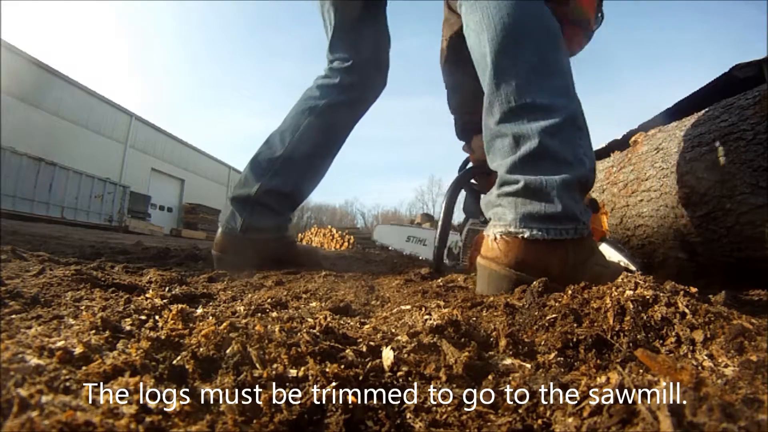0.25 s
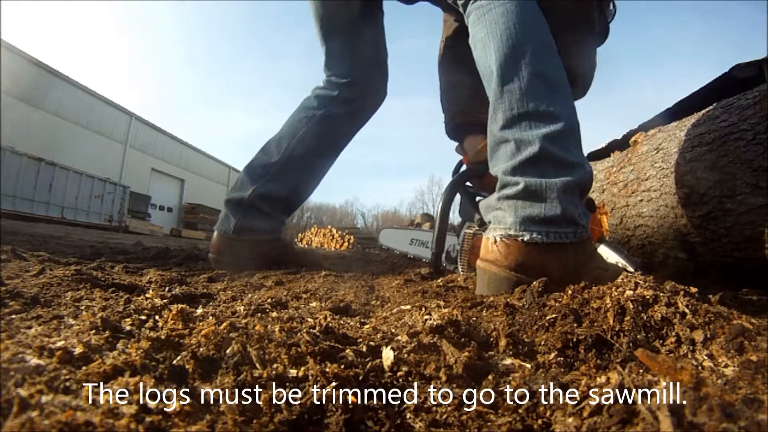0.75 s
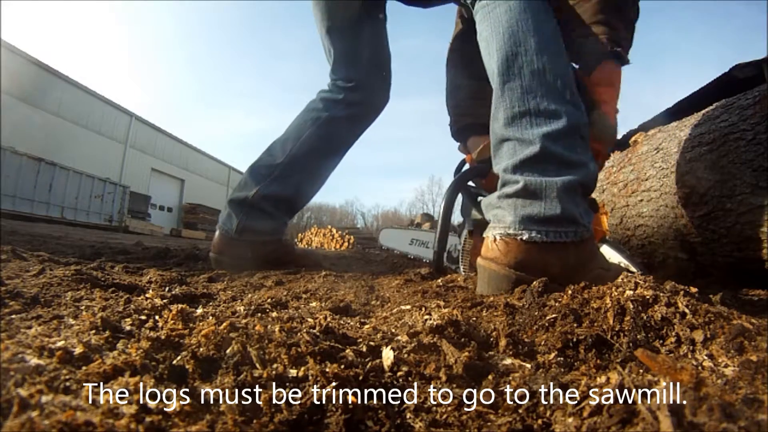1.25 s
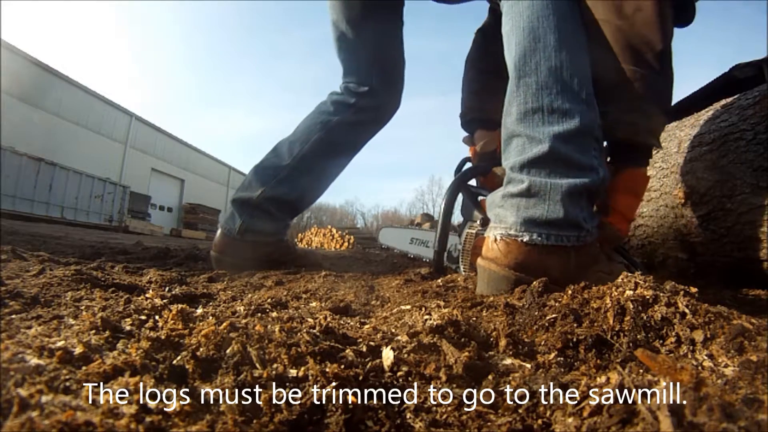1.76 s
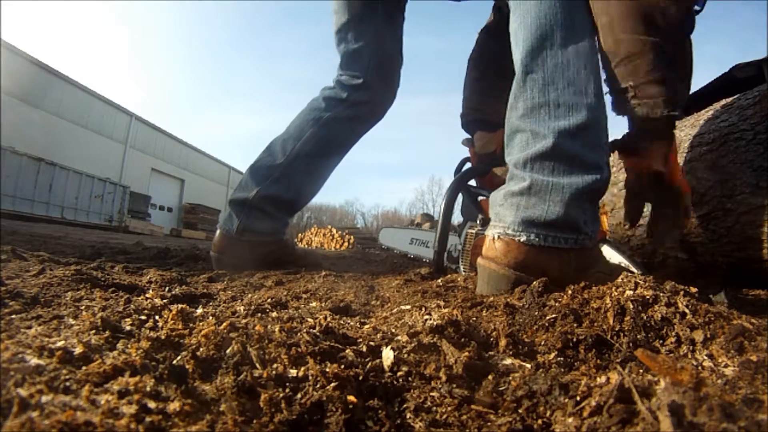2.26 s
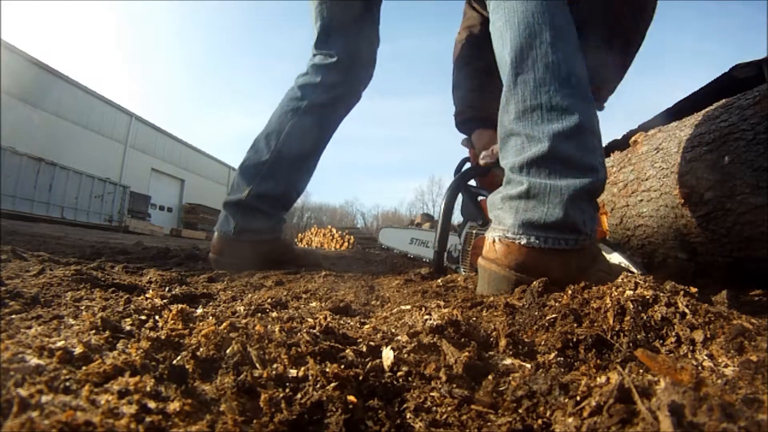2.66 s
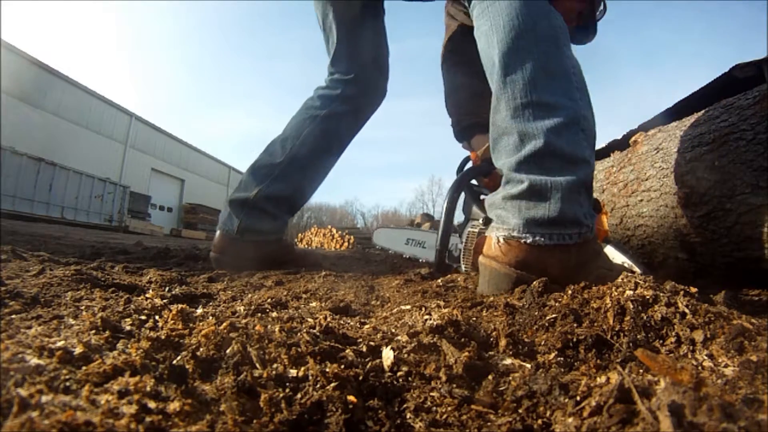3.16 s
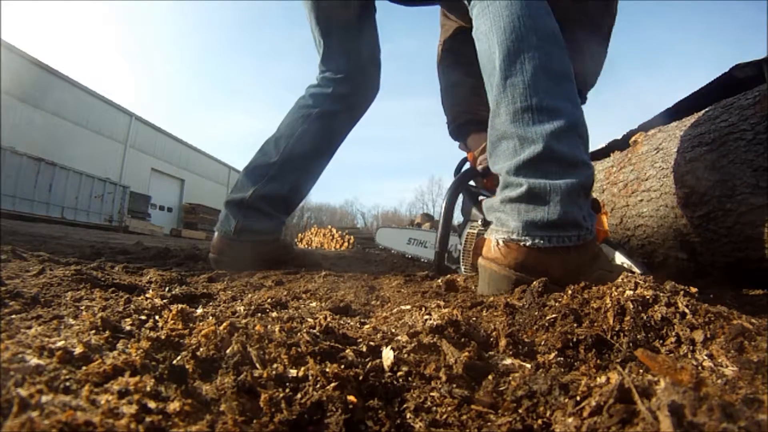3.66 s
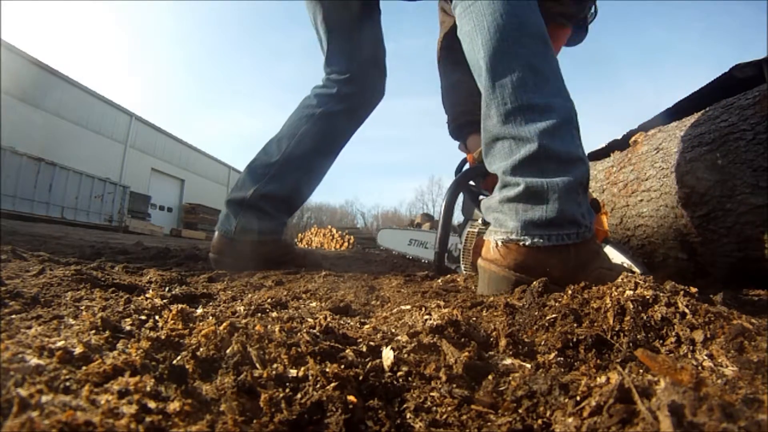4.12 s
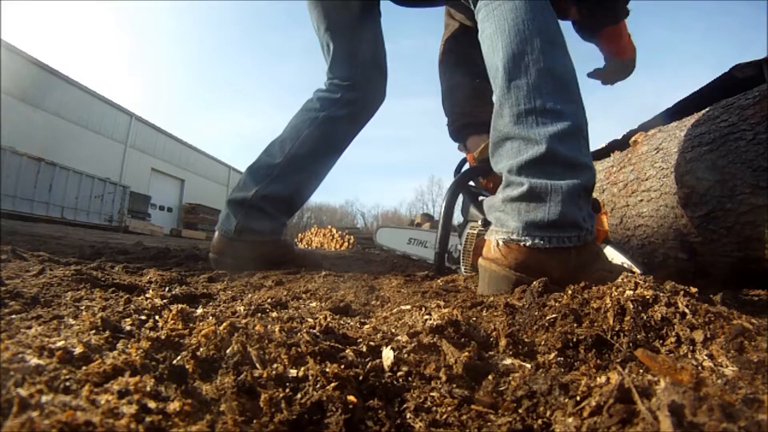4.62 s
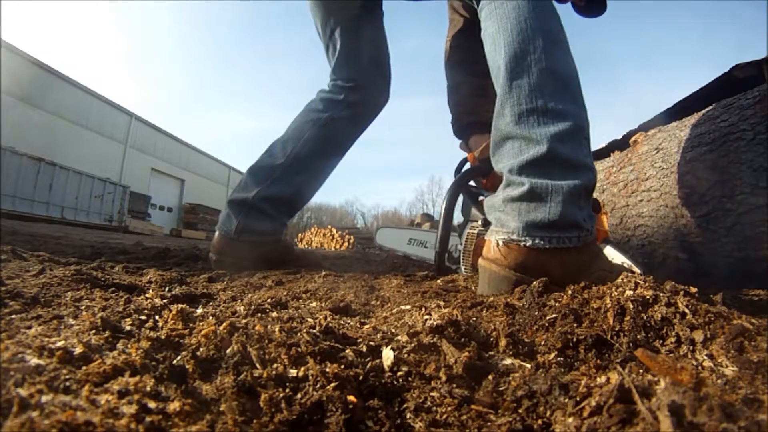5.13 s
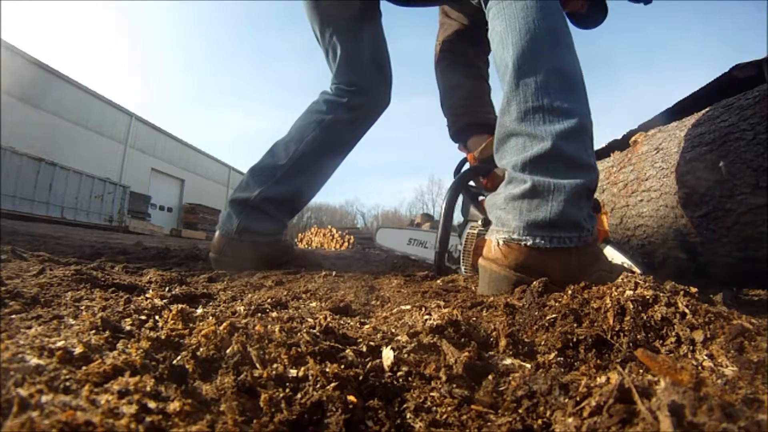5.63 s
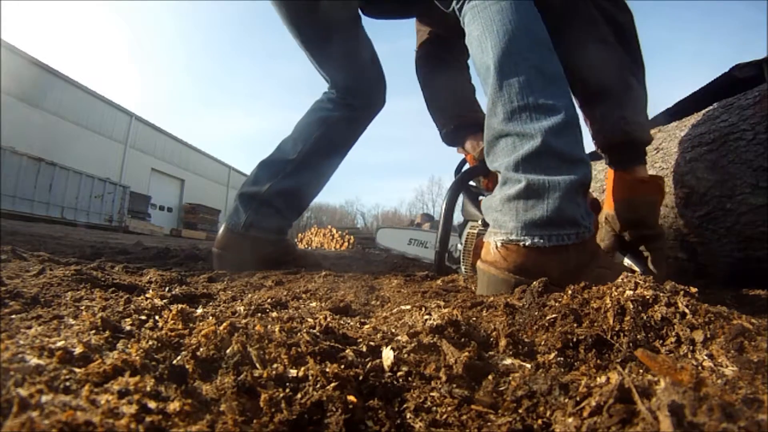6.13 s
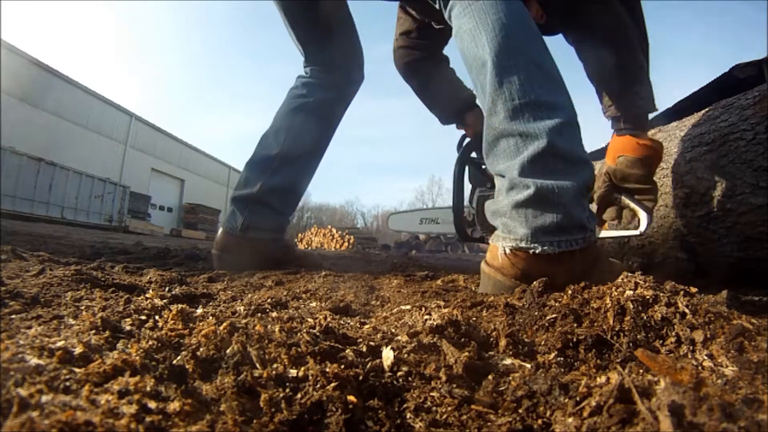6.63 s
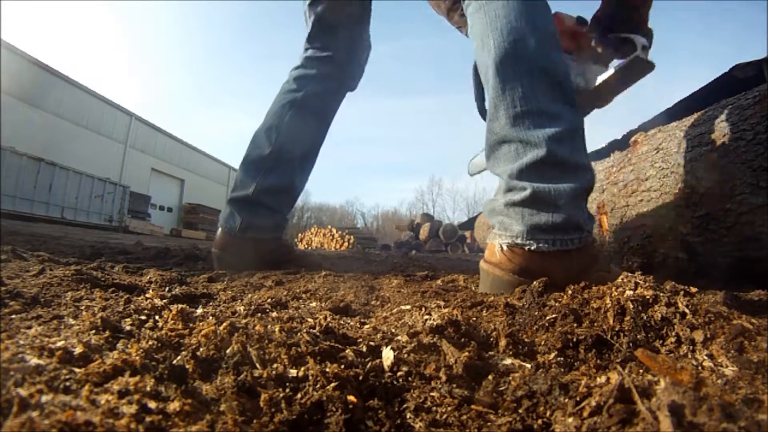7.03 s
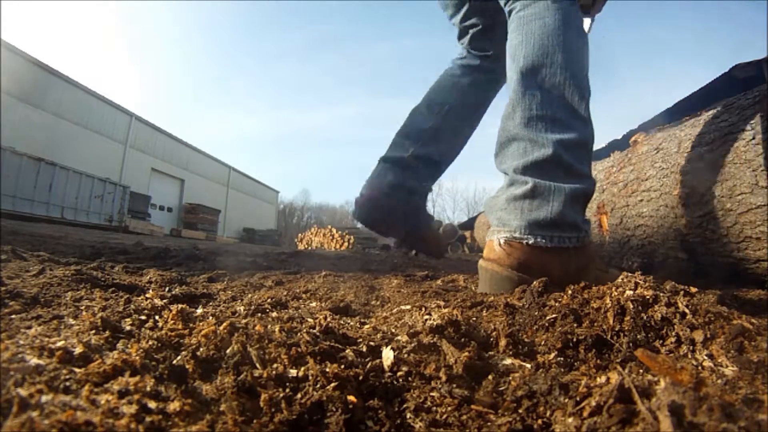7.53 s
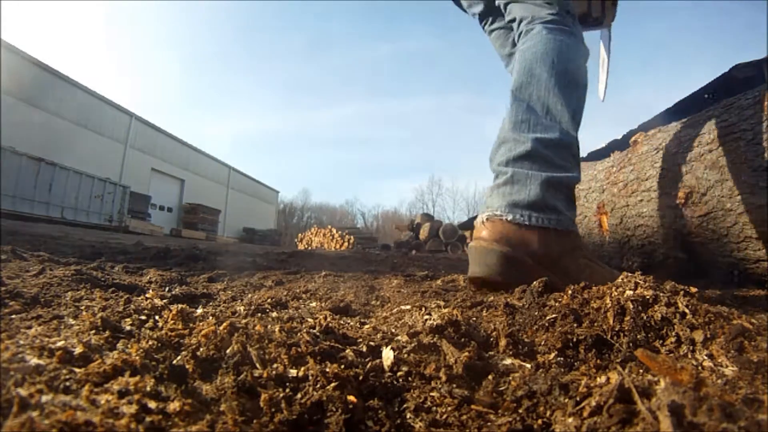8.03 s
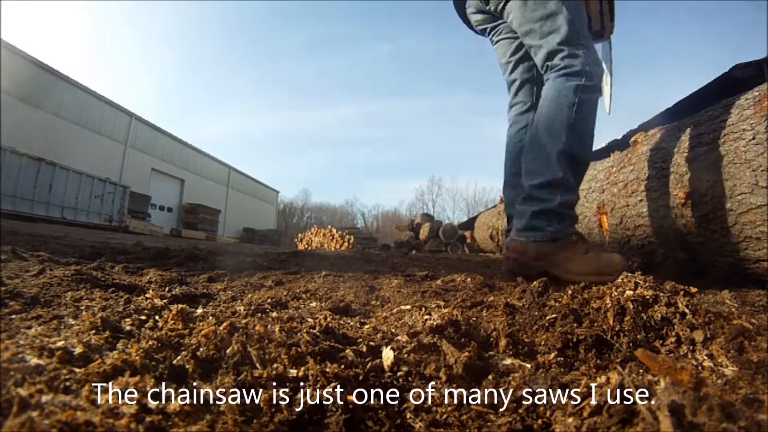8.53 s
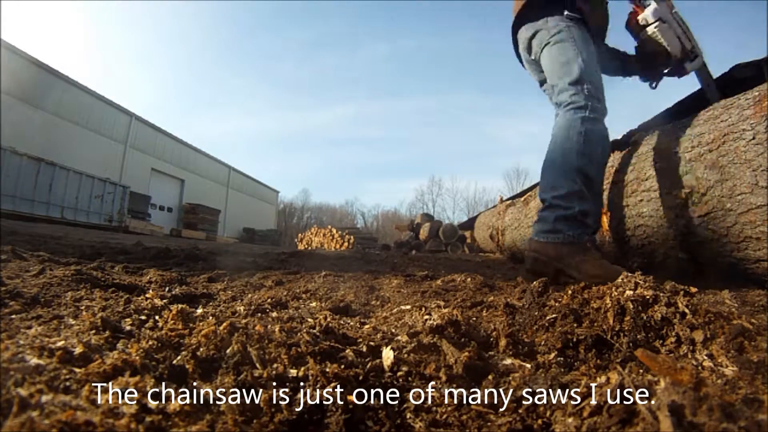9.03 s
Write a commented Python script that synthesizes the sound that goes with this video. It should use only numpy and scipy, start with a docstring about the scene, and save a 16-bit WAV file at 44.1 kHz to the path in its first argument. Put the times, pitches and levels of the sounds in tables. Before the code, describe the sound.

A faint low machinery hum lies over an open yard, heard close to the ground. At 0.2-0.7 s a starter pull clacks and the crank chuffs in slowing dull puffs. Around 0.9 s a two-stroke chainsaw weakly fires, sputters down, picks up briefly at 1.6 s and dies by 1.9 s with pops and a few chuffs. The sound drops out for an instant near 2.4 s, then quiet hum. From 3.0 to 3.5 s another pull gives knocks, sharp pops and a rapid flutter. At 4.2 s a hard pull catches; the engine climbs within half a second to a loud, fast, burbling buzz held until about 6.2 s. It peaks, then sinks into rattling coasting, with short throttle blips at 6.8, 7.1 and 7.3 s and closely spaced surges after. From 7.8 s it stays fast but recedes, metallic and whining, falling away and cutting abruptly at 8.9 s.

```python
"""A low hum like distant machinery comes first, with small clacks from the starter of a two-stroke chainsaw,
pull-started on the ground of a log yard. Spinning the crank makes it chuff; it fires for a second and dies.
On a later pull it catches, runs fast, is blipped several times as it is lifted, and fades away rattling.
Exhaust puffs and tones follow a crank angle, noise bursts make gas and rattle, and decaying sines ring the metal."""
import sys
import numpy as np
from scipy import signal
from scipy.fft import rfft, irfft
from scipy.io import wavfile
from scipy.ndimage import uniform_filter1d

SR = 44100
rng = np.random.default_rng(int(sys.argv[2]) if len(sys.argv) > 2 else 0)


def unload_wav(signal):
    """Save mono or channel-first audio to the path in sys.argv[1] as 16-bit WAV at rate SR, clipped to [-1, 1]."""
    wavfile.write(
        sys.argv[1],
        SR,
        np.round(np.clip(np.atleast_2d(signal).T, -1, 1) * 32767).astype(np.int16),
    )


N = 409240
TIME = np.arange(N) / SR

# tone colour of the warm muffler: frequency_hz, relative level_db
HOT_MUFFLER_COLOUR = [(25, -20.5), (60, 0), (130, -3), (260, 1), (380, 6.5), (520, 10), (640, 8), (780, -5),
                      (950, -20), (1200, -21), (1600, -26), (3000, -49), (6000, -71)]
# tone colour of the rattling metal parts: frequency_hz, relative level_db
METAL_COLOUR = [(200, -35), (600, 12), (900, -5.5), (1400, -13), (1850, -18.5), (2200, -7.5), (3000, 0),
                (3420, -8.5), (3850, -5.5), (4400, -21.5), (5150, -11.5), (6000, -25)]
# tone colour of knocks on the housing: frequency_hz, relative level_db
HOUSING_COLOUR = [(200, -30.5), (700, 4.5), (1250, -4), (1900, -10.5), (2600, -3.5), (3300, -10.5),
                  (4400, -20), (5200, -17.5), (6000, -26.5)]
# stray charges that light with a pop: start_s, relative pop level_db, relative crack level_db
STRAY_POPS = [(1.934, -17, -60), (1.953, -10.5, -30.5), (1.978, -26.5, -59), (3.086, -17, -29),
              (3.206, -15.5, -22), (3.378, -15.5, -30), (4.218, -38, -24)]
# the engine catches and runs down: start_s, end_s, relative exhaust level_db, relative clatter level_db
FALSE_CATCHES = [(0.895, 1.627, -26, -35), (1.624, 1.93, -28, -45.5)]
# spells of throttle: opens_s, shuts_s, opening (0-1), relative level_db, relative third order level_db
THROTTLE_SPELLS = [(4.266, 6.127, 1, -4, -13), (6.133, 6.245, 1, -1.5, -1.5), (6.811, 6.923, 0.89, 1, -3),
                   (7.074, 7.179, 0.96, 0, -9), (7.276, 7.425, 1, -2.5, -8), (7.416, 7.62, 0.4, -1, -3),
                   (7.619, 7.744, 1, -2, -15), (7.758, 8.92, 0.6, -2.5, -1.5)]
RUN_START_S, RUN_END_S = 4.2945, 8.9


def from_db(db):
    """Turn decibels into a plain multiplier."""
    return 10 ** (np.asarray(db) / 20)


def rms_one(x):
    """Scale a sound to an average power of 1."""
    return x / np.sqrt(np.mean(x ** 2) + 1e-20)


def in_time(rows):
    """Draw straight lines between table rows, giving each column a value at every sample."""
    seconds, *columns = np.transpose(rows)
    return [np.interp(TIME, seconds, column) for column in columns]


def between(start, end):
    """Give 1 between two times and 0 elsewhere, with short ramps."""
    gate = (TIME >= start) & (TIME < end)
    return uniform_filter1d(gate * 1., size=128)


def since(times):
    """Seconds since the latest of these moments; a long time before the first."""
    times = np.concatenate([[-10], times])
    latest = np.searchsorted(times, TIME, side="right") - 1
    return TIME - times[latest]


def drift(rate):
    """A wandering random value of spread 1, with this many random points per second."""
    points = rng.standard_normal(8192)
    return rms_one(np.interp(TIME * rate, np.arange(8192), points))


def log_response(colour, size=8192):
    """Frequencies and complex log gain of a body that responds as promptly as its colour allows."""
    hz = np.arange(size // 2 + 1) * SR / size
    knots, db = np.transpose(colour)
    gain = from_db(np.interp(np.log(hz + 1), np.log(knots), db))
    # folding the cepstrum forward gives the minimum-phase response
    cepstrum = irfft(np.log(gain))
    cepstrum[1:size // 2] *= 2
    cepstrum[size // 2 + 1:] = 0
    return hz, rfft(cepstrum)


def through(x, colour):
    """Pass a sound through a body; a unit click comes out with a peak of 1."""
    _, log_gain = log_response(colour)
    pulse = irfft(np.exp(log_gain))
    return signal.fftconvolve(x, pulse / np.abs(pulse).max())[:N]


def ring(x, hz, t60):
    """Clicks set a sine ringing, which falls by 60 dB in t60 seconds."""
    decay = from_db(-60 / (t60 * SR))
    step = 2 * np.pi * hz / SR
    return signal.lfilter([0, np.sin(step)], [1, -2 * decay * np.cos(step), decay * decay], x + 1e-18)


def clicks(at, heights):
    """Place single-sample clicks at the given sample numbers."""
    return np.bincount(np.asarray(at, int), heights, N)[:N]


def evened(x, span_s=0.81):
    """Hold the short-term power close to 1."""
    power = uniform_filter1d(x ** 2, size=int(span_s * SR))
    return x / np.sqrt(np.abs(power) + np.mean(x ** 2) / 1000)


def burst(hits, decay_s, rise_s=0.0033):
    """Noise that swells at each hit and dies away."""
    fall, rise = np.exp(-1 / (decay_s * SR)), np.exp(-1 / (rise_s * SR))
    swell = signal.lfilter([1 - rise], [1, -fall - rise, fall * rise], hits + 1e-18)
    return swell * rng.standard_normal(N)


def revolutions(speed, start, end):
    """Crank angle in turns, and the samples at which each turn begins."""
    turns = np.cumsum(speed * (TIME >= start) * (TIME < end)) / SR
    return turns, np.flatnonzero(np.diff(np.ceil(turns)) > 0)


def yard(first_db=-10, air_db=-11):
    """Distant machinery: three low multiples of a shaft's speed over a dull rush of noise."""
    # distant machinery: start_s, shaft pitch_hz, relative level_db, share of the third order (0-1)
    machinery = [(0, 41.8, -34, .05), (2.35, 43.97, -36, .05), (2.44, 40.5, -69.5, .05),
                 (2.6, 41.26, -56.5, .1), (2.9, 39.9, -49.5, .1), (3.4, 41, -37.5, .2),
                 (3.5, 33.5, -41, .75), (4.2, 33.9, -43.5, .8), (4.5, 33.2, -76.5, .8),
                 (8.87, 33.2, -82.5, .8)]
    # tone colour of the rush: frequency_hz, relative level_db
    rush_colour = [(25, -6.5), (100, 4), (200, -9.5), (550, -10), (900, -27), (1800, -37.5), (3000, -33.5),
                   (6000, -48.5)]
    shaft_hz, db, third = in_time(machinery)
    angle = 2 * np.pi * np.cumsum(shaft_hz) / SR
    third = np.clip(third, 0, 1)
    hum = from_db(first_db) * np.sin(angle)
    hum = hum + np.sqrt(1 - third ** 2) * np.sin(2 * angle) + third * np.sin(3 * angle)
    rush = rms_one(through(rng.standard_normal(N), rush_colour))
    return from_db(db) * (0.64 * hum + from_db(air_db) * rush)


def knocks(rattle_db=-9, housing_db=7, swell_s=0.0038):
    """The starter pawls catch with a short rattle, and the housing gives a hollow knock."""
    # starter and housing knocks: start_s, relative rattle level_db, ring pitch_hz, relative ring level_db
    knock_rows = [(.0523, -43.5, 590, -50), (.2279, -33.5, 536, -36), (.7356, -44.5, 606, -55),
                  (.829, -26.5, 607, -26), (1.278, -23.5, 577, -24.5), (1.6297, -30.5, 490, -43),
                  (1.953, -44, 490, -30), (2.0657, -44.5, 477, -28), (2.2115, -44.5, 670, -49),
                  (2.3486, -50, 682, -53), (2.9947, -39.5, 626, -36.5), (3.0847, -42.5, 502, -33),
                  (3.2048, -32, 565, -33.5), (3.2715, -44, 535, -35), (3.3766, -33.5, 467, -29.5),
                  (3.4681, -42.5, 590, -42.5), (3.5746, -51, 597, -54), (3.635, -52, 592, -73),
                  (3.73, -54.5, 551, -61), (3.78, -65, 593, -72), (4.115, -44, 580, -49),
                  (4.1482, -38, 728, -32.5), (4.218, -28.5, 447, -24)]
    s, db, ring_hz, ring_db = np.transpose(knock_rows)
    hits = clicks(s * SR, from_db(db + rattle_db))
    rattle = through(burst(hits, decay_s=0.0054, rise_s=0.00043), HOUSING_COLOUR)
    housing = np.zeros(N)
    age = np.arange(4096) / SR
    swell = age / swell_s * np.exp(1 - age / swell_s)   # peaks at 1 after swell_s
    for start, hz, level in zip((s * SR).astype(int), ring_hz, ring_db):
        housing[start:start + len(age)] += from_db(level + housing_db) * swell * np.sin(2 * np.pi * hz * age)
    return rattle + housing


def cracks():
    """Each pop starts with a dry crack from the housing, at its own level."""
    s, _, db = np.transpose(STRAY_POPS)
    return through(clicks(s * SR, from_db(db)), HOUSING_COLOUR)


def clatter(jolts, steady=0.49, ring_db=-1, running_db=4.5):
    """Every jolt of the crank shakes chain and clutch against the ringing bar; after a false catch it settles."""
    # chain and clutch clatter while running: start_s, relative level_db
    clatter_level = [(4.3, -51), (4.31, -54), (4.85, -50), (6.29, -51), (6.45, -45), (6.76, -44),
                     (6.79, -50.5), (7.22, -41.5), (8.21, -44), (8.86, -57)]
    # ring of the bar and cooling fins: pitch_hz, relative level_db, time to fall 60 dB (s)
    bar_modes = [(1228, -21, 0.58), (2190, -21.5, 0.087), (3086, -21, 0.09), (3830, -24, 0.2)]
    jolt_decay_s, settle_db_per_s = .009, 27.5
    loose = steady * from_db(1.3 * drift(70)) * rng.standard_normal(N)
    shake = evened(burst(jolts, jolt_decay_s, rise_s=0.0015) + loose, span_s=0.18)
    bar = sum(from_db(mode_db) * rms_one(ring(shake, hz, t60)) for hz, mode_db, t60 in bar_modes)
    level = from_db(in_time(clatter_level)[0] + running_db) * between(RUN_START_S, RUN_END_S)
    for start, end, _, db in FALSE_CATCHES:
        settling_db = db - settle_db_per_s * np.maximum(TIME - start, 0)
        level = level + from_db(settling_db) * between(start, end)
    return level * (rms_one(through(shake, METAL_COLOUR)) + from_db(ring_db) * bar)


def cold_exhaust(puffs, gas_db, gas_s):
    """Each puff thumps the muffler, rings its can and trails a rush of gas."""
    # tone colour of the cold muffler: frequency_hz, relative level_db
    cold_colour = [(25, -49), (45, -16), (85, -4), (170, -8), (260, -4.5), (340, -4), (470, -4), (600, -26),
                   (750, -20.5), (950, -26.5), (1400, -47.5), (3000, -49.5), (6000, -55.5)]
    # ring of the muffler can after a puff: pitch_hz, relative level_db, time to fall 60 dB (s)
    can_modes = [(279.1, -18.5, 0.38), (407, -44, .09), (505, -32, 0.049), (645, -47, .09)]
    can = sum(from_db(db) * ring(puffs, hz, t60) for hz, db, t60 in can_modes)
    gas = through(from_db(gas_db) * burst(puffs, gas_s), HOT_MUFFLER_COLOUR)
    return through(puffs, cold_colour) + can + gas


def strokes():
    """List time (s), relative level (dB) and sharpness (0-1) of each lone stroke of the piston."""
    # heaves of the piston as the starter cord tugs it over compression: start_s, relative level_db
    heaves = [(.26, -26.5), (0.397, -24.5), (0.748, -30), (0.849, -23), (.877, -23.5), (3.026, -32.5),
              (4.17, -26)]
    # spins of the crank without running: first stroke start_s, end_s, first gap_s,
    # growth of the gap (multiplier), relative level_db, loss per stroke_db, sharpness (0-1)
    spins = [(.313, .7, .0315, 1.148, -12.5, 1.3, .25), (2.007, 2.23, .029, 1.125, -14.5, 2.3, .7),
             (3.105, 3.45, .018, 1.087, -25, .5, .95), (4.195, 4.282, .022, .91, -11.5, .7, .8)]
    rows = [(s, db, 0) for s, db in heaves]
    rows += [(s, db, .9) for s, db, _ in STRAY_POPS]
    for s, end, gap, growth, db, loss_db, sharp in spins:
        while s < end:
            rows.append((s, db, sharp))
            s += gap
            gap = max(gap * growth, .01)
            db -= loss_db
    return np.transpose(rows)


def chuffs(pawl_db=-44, pop_gas_db=-34):
    """Lone strokes: dull when only pumping air, sharper when the charge lights; duller ones strain the starter."""
    pawl_lead_s = 0.0065   # the starter strains just before each puff
    s, db, sharp = strokes()
    sharp = np.clip(sharp, 0, 1)
    dull_heights = from_db(db) * (1 - sharp)
    dull_puffs = clicks(s * SR, dull_heights)
    sharp_puffs = clicks(s * SR, from_db(db) * sharp)
    pop_gas = from_db(pop_gas_db) * burst(sharp_puffs, decay_s=0.011)
    pops = through(sharp_puffs + pop_gas, HOT_MUFFLER_COLOUR)
    strains = clicks((s - pawl_lead_s) * SR, np.sqrt(dull_heights))
    pawls = from_db(pawl_db) * through(burst(strains, decay_s=0.008, rise_s=0.0097), METAL_COLOUR)
    return cold_exhaust(dull_puffs, gas_db=-32.5, gas_s=0.031) + pops + pawls


def false_start(puff_db=-3.0, ports_db=6, swing_decay=0.2):
    """The engine fires slowly and runs down twice; gas swings on in the ports, in step with the crank."""
    # crank speed in the false start: start_s, revolutions per s
    sputter_speed = [(.896, 47.7), (.98, 50.2), (1.02, 66.6), (1.17, 60.3), (1.28, 56.7), (1.45, 38.8),
                     (1.62, 21.6), (1.64, 54.6), (1.78, 41.4), (1.93, 26.7)]
    # ringing of the gas in the ports: multiple of the crank speed, relative level_db
    port_tones = [(5.0, -14), (8.6, -9), (10.8, -12.5)]
    kick_db, kick_s = 3, 0.084   # extra level of the first firings, and how fast it fades
    speed, = in_time(sputter_speed)
    turns, at = revolutions(speed, .8945, 1.925)
    late = rng.normal(0, 12, len(at))   # samples early or late
    puffs = clicks(at + late, from_db(rng.standard_normal(len(at))))
    exhaust = evened(cold_exhaust(puffs, gas_db=-33, gas_s=0.026))
    stroke = turns % 1
    ports = 0
    for multiple, port_db in port_tones:
        wobble = .045 * multiple * drift(45)
        ports = ports + from_db(port_db) * np.sin(2 * np.pi * multiple * stroke + wobble)
    ends_faded = np.minimum(20 * np.minimum(stroke, 1 - stroke), 1)   # no jump between turns
    ports *= np.exp(-swing_decay * stroke) * ends_faded * (speed / 60) ** 0.79
    level = sum(from_db(db) * between(start, end) for start, end, db, _ in FALSE_CATCHES)
    kick = from_db(kick_db * np.exp(-since([row[0] for row in FALSE_CATCHES]) / kick_s))
    swinging = from_db(ports_db) * ports * between(0.97, 1.92)
    return level * kick * (from_db(puff_db) * exhaust + swinging), puffs


def throttle_hand():
    """Opening, extra dB and third-order dB of the spells of throttle at every sample."""
    move_s = 0.02   # time the throttle takes to move
    held = 0
    for opens, shuts, *values in THROTTLE_SPELLS:
        held = held + np.outer(values, (TIME >= opens) & (TIME < shuts))
    # smooth along time only: each row is one setting
    opening, db, third_db = uniform_filter1d(held * 1., size=int(move_s * SR))
    return np.clip(opening, 0, 1), db, third_db


def exhaust_note(angle, speed, note, away_db, third_db, smear, waver_db):
    """Twelve wavering multiples of the firing rate; higher ones leave the can later and smear each puff."""
    bass_follows = .5   # share of the moving-away loss in the two lowest orders
    hz, muffler = log_response(HOT_MUFFLER_COLOUR)
    note_hz, note_db = np.transpose(note)
    out = 0
    for k in range(1, 13):
        db = np.interp(k * speed, note_hz, note_db) + away_db * (bass_follows if k <= 2 else 1)
        db = db + third_db * (k == 3)
        db = db + waver_db * drift(30)
        phase = np.interp(k * speed, hz, muffler.imag) - smear * k * k
        out = out + from_db(db) * np.cos(k * angle + phase)
    return np.sqrt(2) * out


def drive_whine(angle, speed, throttle):
    """High orders of crank and chain drive glide with the speed and stand out when the engine coasts slowly."""
    # strength of the whine by its frequency: frequency_hz, relative level_db
    whine_colour = [(600, -9), (850, 8), (1150, 3.5), (1500, -5.5), (1900, -3), (2600, -5.5), (3200, -23),
                    (4000, -17)]
    coasting_db, throttle_db = -48.5, -9   # level when coasting, and its change under full throttle
    knee_rev_per_s, db_per_rev = 112, -0.2069   # above the knee it fades with each extra rev/s
    hz, db = np.transpose(whine_colour)
    orders = 0
    for k in range(7, 35):
        phase = k * angle + rng.uniform(0, 2 * np.pi)
        orders = orders + np.interp(k * speed, hz, from_db(db)) * np.cos(phase.astype(np.float32))
    level_db = coasting_db + throttle_db * throttle + db_per_rev * np.maximum(speed - knee_rev_per_s, 0)
    return from_db(level_db) * evened(orders)


def running(coast_db_per_octave=2, coast_rasp_db=0, rasp_db_per_octave=-4, uneven_db=1.46):
    """Turns fire or only pump air; misfires make the fast note burble, and gas rasps, most at low speed."""
    # speed of the running engine: start_s, revolutions per s
    run_speed = [(4.29, 64), (4.42, 72.5), (4.6, 105), (4.75, 119.9), (4.88, 120.4), (4.99, 128.1),
                 (5.08, 125.3), (5.25, 131.8), (5.68, 128.8), (5.78, 123.9), (5.92, 131.4), (6.15, 131.5),
                 (6.26, 150), (6.5, 115.7), (6.82, 78.5), (6.935, 122.5), (7.09, 100.3), (7.19, 125),
                 (7.3, 106.5), (7.45, 139), (7.64, 120.1), (7.75, 139), (8.07, 123.4), (8.15, 114.5),
                 (8.6, 110.6), (8.86, 99.9)]
    # the muffler is turned aside and carried off: start_s, relative level_db
    carried_off = [(4.3, 5), (6.8, 2.5), (7.3, 2.5), (7.9, -3), (8.3, -6.5), (8.6, -11.5), (8.86, -23.5)]
    # strength of an exhaust order with a burning charge: frequency_hz, relative level_db
    fired_colour = [(70, -29), (130, -35), (190, -40), (260, -32.5), (380, -35.5), (450, -27), (520, -25.5),
                    (630, -33), (760, -41), (890, -54), (1050, -77.5), (1600, -70.5)]
    # the same with air only: frequency_hz, relative level_db
    coasting_colour = [(80, -40), (130, -39.5), (230, -39), (340, -34), (460, -33.5), (580, -28),
                       (690, -36.5), (820, -60), (1050, -66.5), (1600, -65.5)]
    fast_rev_per_s, power_db_per_octave = 125, 5.5   # a fired stroke grows louder with speed
    misfire_gap_s, misfire_depth = .042, 0.83   # a charge lights poorly at nearly even intervals
    sag_db, sag_s = 12.5, 0.22   # the exhaust sags when the throttle shuts, then recovers
    wobble_turns, throttle_steadies = .011, .35   # crank jitter, and the share firing takes away
    rough_db, gas_db, gas_decay_s = -40.5, -36.5, .012   # uneven puffs and rushing gas
    firing_rasp_db = -3.5   # a firing engine rasps less
    steady_jolt, misfire_jolt = .22, 1.25   # how hard a plain stroke and a misfire shake the chain

    (speed,), (away_db,) = in_time(run_speed), in_time(carried_off)
    throttle, push_db, third_db = throttle_hand()
    octaves = np.log2(speed / fast_rev_per_s)
    turns, at = revolutions(speed, RUN_START_S, RUN_END_S)

    gaps = misfire_gap_s * rng.normal(1, .08, 130)
    miss_s = RUN_START_S + np.cumsum(gaps) - misfire_gap_s
    missed = np.isin(np.arange(len(at)), np.searchsorted(at, miss_s * SR))
    burble = np.minimum(speed[at] / fast_rev_per_s, 1) ** 2   # misfires matter less at low speed
    burning = 1 - np.clip(misfire_depth, 0, 1) * burble * missed
    lit = throttle * np.interp(np.arange(N), at + 130, burning)
    strength = from_db(uneven_db * rng.standard_normal(len(at)))

    wobble = wobble_turns * (1 - throttle_steadies * throttle) * drift(70)
    angle = 2 * np.pi * (turns + wobble)
    sag = from_db(-sag_db * np.exp(-since([row[1] for row in THROTTLE_SPELLS]) / sag_s))
    fired = exhaust_note(angle, speed, fired_colour, away_db, third_db, smear=0.412, waver_db=0.53)
    fired = from_db(push_db + power_db_per_octave * octaves) * fired
    coasting = exhaust_note(angle, speed, coasting_colour, away_db, 0, smear=0.513, waver_db=3)
    coasting = sag * from_db(coast_db_per_octave * octaves) * coasting
    note = np.interp(np.arange(N), at, strength) * (lit * fired + (1 - lit) * coasting)

    uneven_puffs = clicks(at, rng.choice([-1, 1], len(at)))
    rough = from_db(rough_db) * evened(through(uneven_puffs, HOT_MUFFLER_COLOUR))
    rush = burst(clicks(at, strength), gas_decay_s)
    gas = from_db(gas_db) * evened(through(rush, HOT_MUFFLER_COLOUR))
    rasp_level = throttle * from_db(firing_rasp_db) + (1 - throttle) * sag * from_db(coast_rasp_db)
    rasp = (rough + gas) * from_db(rasp_db_per_octave * octaves) * rasp_level

    sound = note + from_db(away_db) * (rasp + drive_whine(angle, speed, throttle))
    jolts = clicks(at, steady_jolt + misfire_jolt * missed * throttle[at])
    return sound * between(RUN_START_S, RUN_END_S), jolts


def scene():
    """Add the saw and the yard; the whole sound drops out once and ends abruptly."""
    # level of the whole sound: start_s, level_db
    fader = [(0, 0), (2.356, 0), (2.364, -35), (2.43, -35), (2.46, 0), (8.862, 0), (8.868, -17),
             (8.895, -19), (8.91, -90)]
    sputter, puffs = false_start()
    engine, jolts = running()
    saw = chuffs() + cracks() + sputter + engine + knocks() + clatter(2.7 * puffs + jolts)
    return ((saw + yard()) * from_db(in_time(fader)[0]))[None]


def record(dry):
    """Samples are held at a low rate, which mirrors the sound into a glassy treble; the top is cut."""
    hold_hz, cutoff_hz = 12000, 15500
    band = signal.sosfilt(signal.butter(12, 5850, fs=SR, output="sos"), dry)
    mirrored = band * (1 + 2 * np.cos(2 * np.pi * hold_hz * TIME))
    hz = np.arange(N // 2 + 1) * SR / N
    held = irfft(rfft(mirrored) * np.sinc(hz / hold_hz), N)   # holding dulls the treble
    return signal.sosfilt(signal.ellip(10, .3, 80, cutoff_hz, fs=SR, output="sos"), held)


dry = scene()
out = record(dry)
unload_wav(out)
```